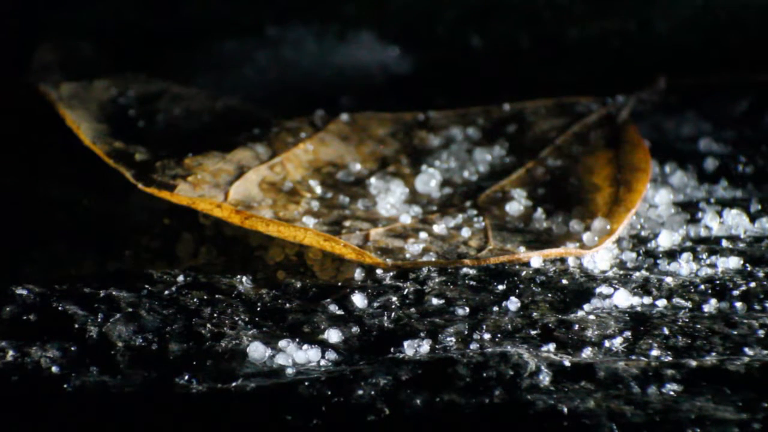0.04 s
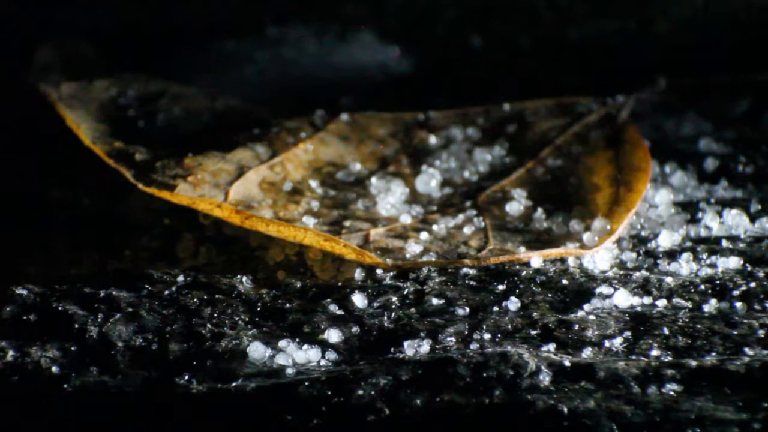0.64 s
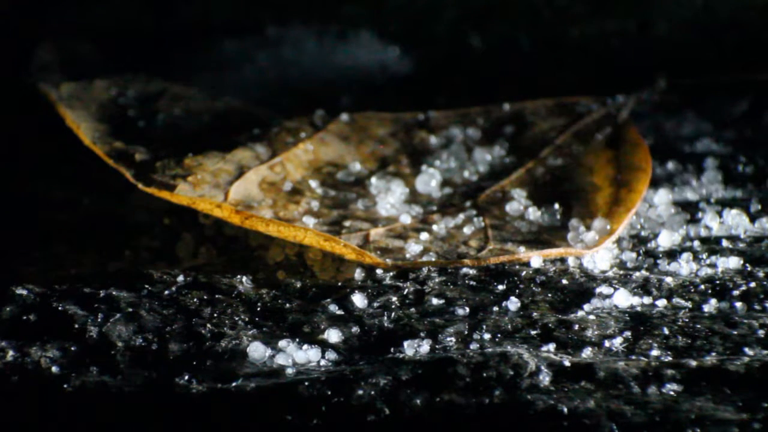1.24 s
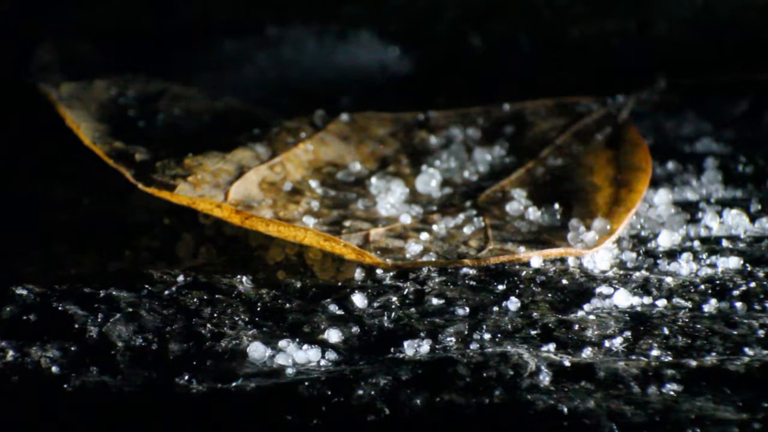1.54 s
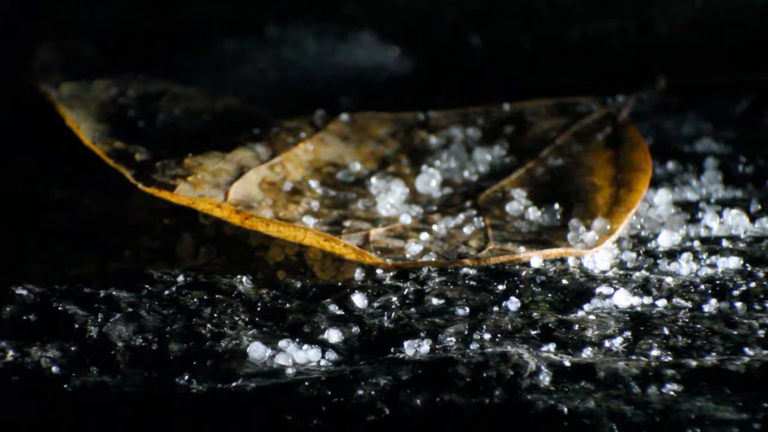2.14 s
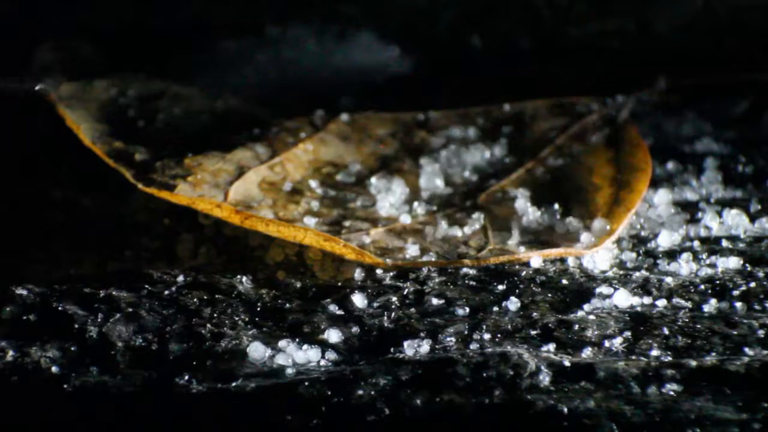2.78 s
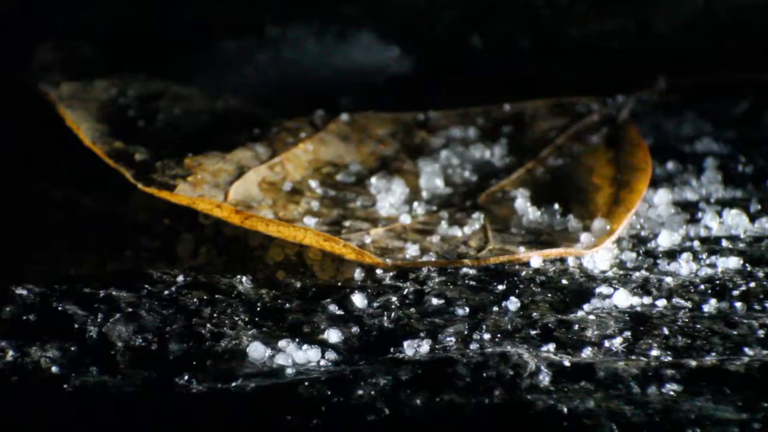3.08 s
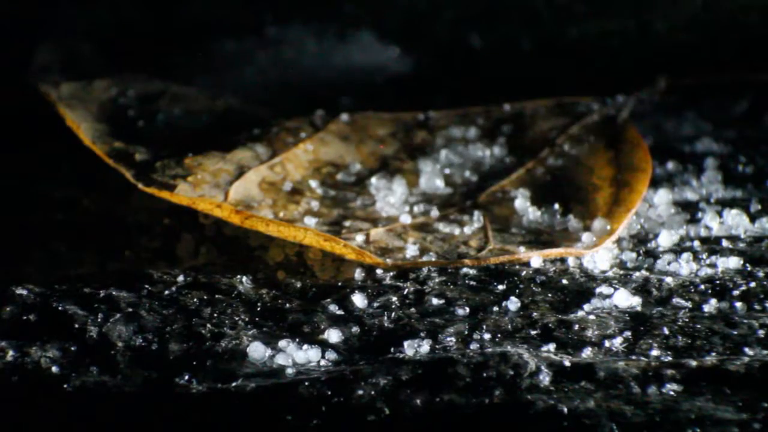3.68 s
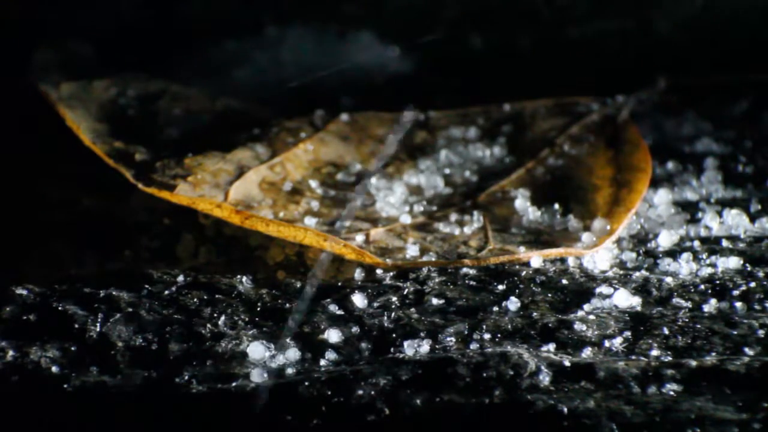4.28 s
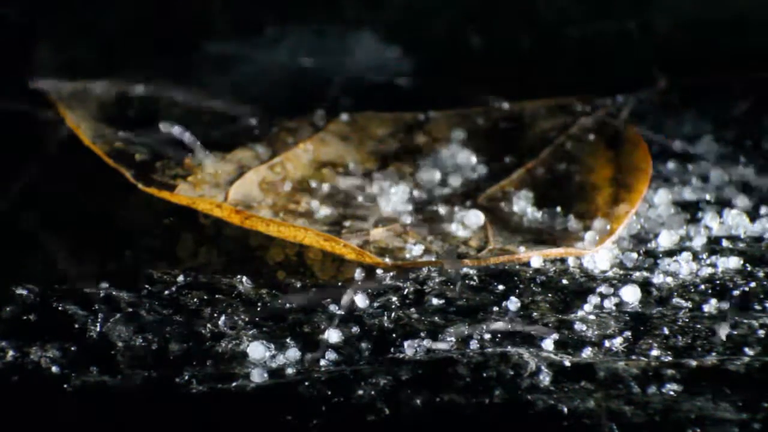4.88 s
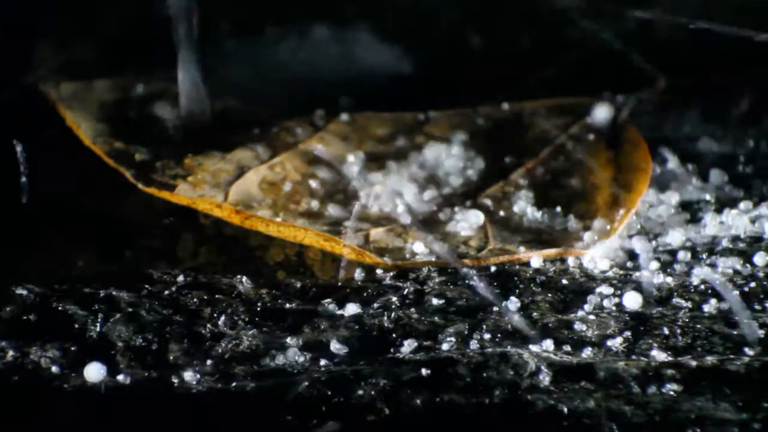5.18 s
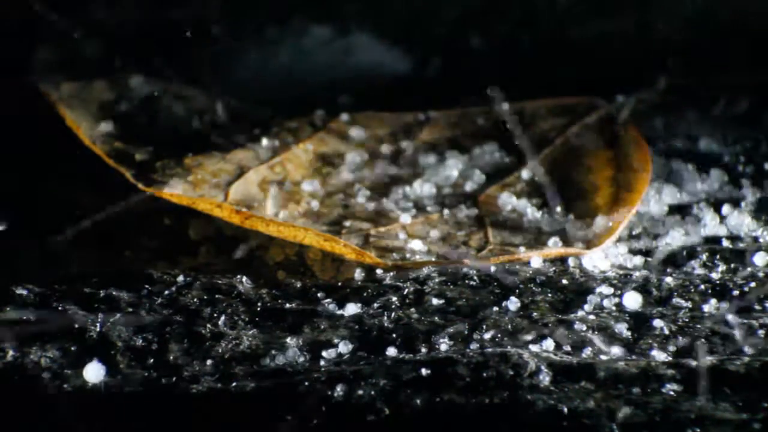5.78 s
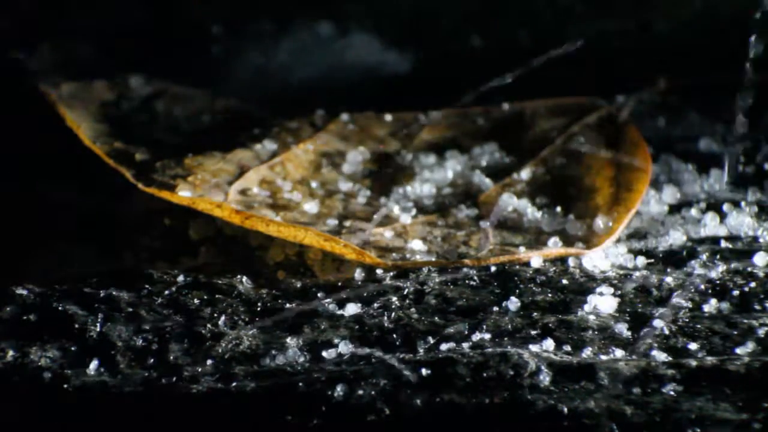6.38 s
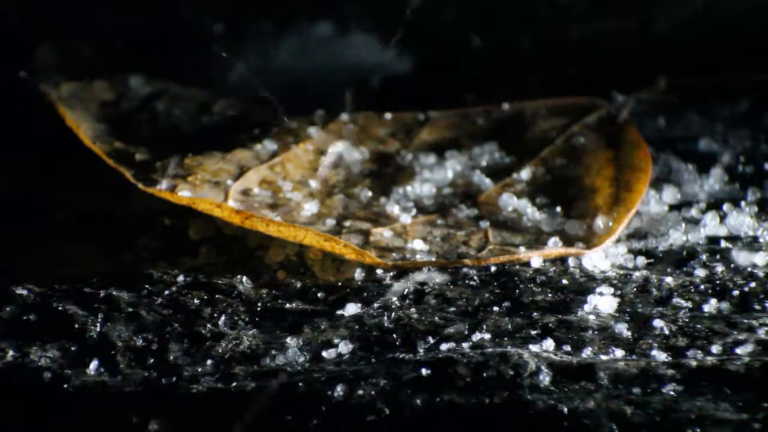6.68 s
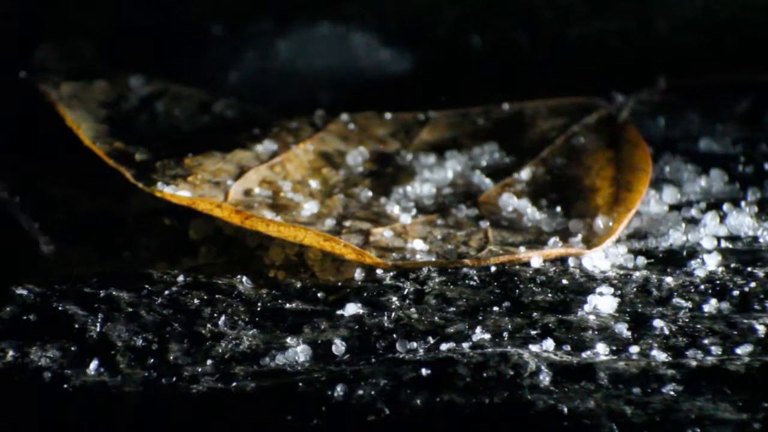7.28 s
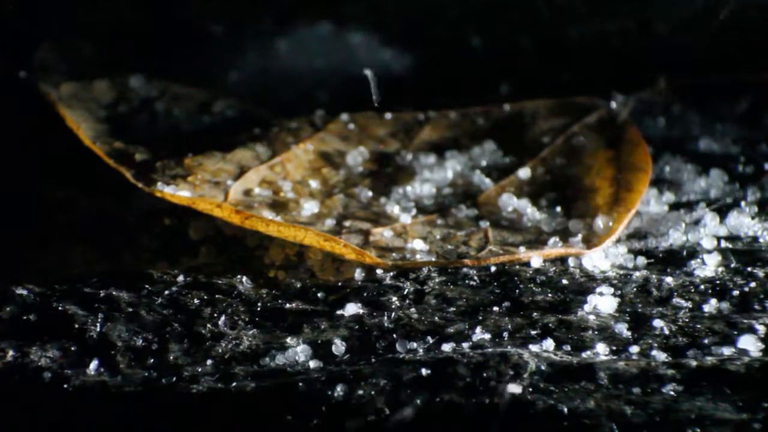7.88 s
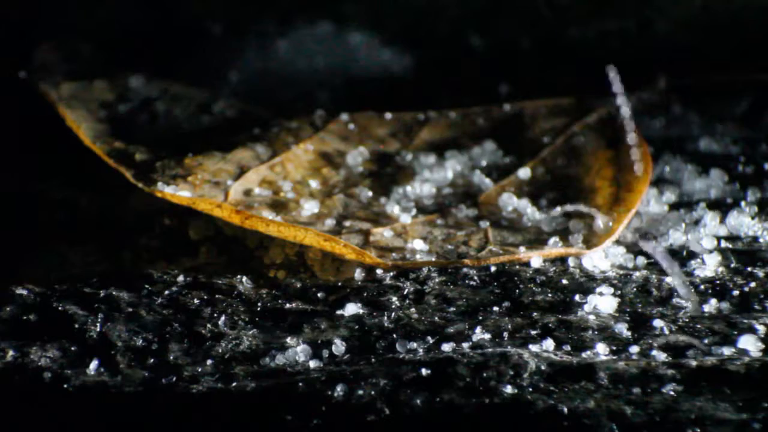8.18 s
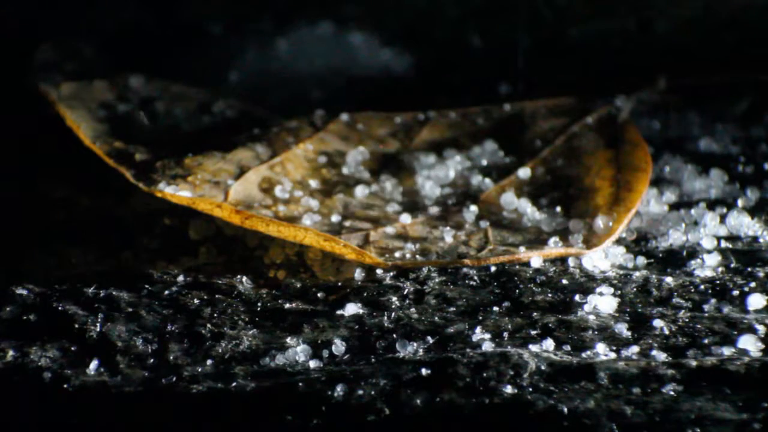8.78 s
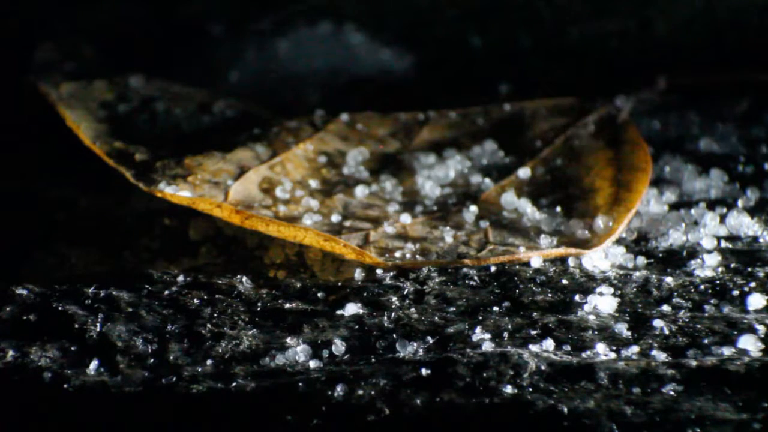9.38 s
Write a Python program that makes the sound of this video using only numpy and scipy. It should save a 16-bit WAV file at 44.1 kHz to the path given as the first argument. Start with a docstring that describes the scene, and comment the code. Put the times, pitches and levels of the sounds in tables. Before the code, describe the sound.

Sleet falls outdoors for about nine and a half seconds without a break. Countless distant pellets make a fine, high patter and fizz, while near ones hit a dry leaf and icy ground close to the microphone as sharp, brittle, irregular ticks, each with a tiny bounce. The shower is lightest for the first two seconds, builds to its fullest between 4 and 5 seconds, then stays fairly dense and eases a little toward the end. Harder ticks stand out near 0.6, 2.7 and 3.2 seconds, in a quick cluster from 4.1 to 4.7, and at 6.6 and 6.9, with the sharpest at 8.4 seconds. Underneath runs a faint low rumble of light wind, weakest around 5 to 6 seconds. It buffets the microphone softly and briefly near 1.6 seconds, around 3 seconds, and again near 4.4, 5.6 and 8.7 seconds.

```python
"""Sleet pellets fall on a dry leaf and icy ground at night.
Near ones tick, ring the struck spot and bounce once; countless far ones patter and fizz.
A light wind rumbles, and its eddies now and then buffet the microphone.
The hardest ticks push the recorder's limiter, so the patter ducks briefly after them."""
import sys
import numpy as np
from scipy import signal
from scipy.fft import rfft, irfft, next_fast_len
from scipy.io import wavfile
from scipy.ndimage import uniform_filter1d, map_coordinates

SR = 44100
rng = np.random.default_rng(int(sys.argv[2]) if len(sys.argv) > 2 else 0)


def store_wav(level_fs):
    """Save 16-bit WAV to argv[1]."""
    pcm = np.round(np.clip(np.atleast_2d(level_fs), -1, 1) * 32767)
    wavfile.write(sys.argv[1], SR, pcm.T.astype(np.int16))


N = 420713

# wind strength: (time [s], relative rumble level [dB], relative air rush level [dB])
WIND_LEVELS = [(0.0, -37, -42), (0.29, -39.5, -40), (0.64, -43, -44), (1.83, -39.5, -41.5),
               (2.63, -37.5, -42), (3.0, -36, -39), (3.4, -41, -44), (4.01, -43.5, -41), (4.38, -44, -45),
               (4.59, -46.5, -49.5), (5.21, -49.5, -58), (5.74, -49.5, -53), (6.3, -43.5, -44.5),
               (6.93, -45, -45), (7.52, -42.5, -44), (8.1, -44, -43.5), (8.26, -43, -44), (9.54, -44, -42)]
# shower strength: (time [s], relative level [dB])
SHOWER_LEVELS = [(0.0, -31), (0.4, -31), (0.64, -33.5), (1.86, -30), (2.55, -28), (3.03, -25.5),
                 (3.43, -27), (3.82, -25), (3.96, -21), (4.97, -22.5), (5.29, -26), (6.35, -23.5),
                 (6.93, -26.5), (7.44, -24.5), (8.13, -25), (8.5, -26), (9.11, -27.5), (9.54, -28)]


def amp(db):
    """Decibels to gain."""
    return 10 ** (np.asarray(db) / 20)


def unit_rms(x):
    """Scale to rms 1."""
    return x / np.sqrt(np.mean(x ** 2) + 1e-20)


def unit_energy(x):
    """Scale to the energy of 1 ms at rms 1."""
    return unit_rms(x) * np.sqrt(SR / 1000 / len(x))


def curves(rows):
    """Per-sample curve for each column after the time."""
    times_s, *columns = np.transpose(rows)
    return [np.interp(np.arange(N) / SR, times_s, column) for column in columns]


def wobble(rate_hz):
    """Smooth random curve with knots at rate_hz."""
    return map_coordinates(rng.standard_normal(1024), [np.arange(N) * rate_hz / SR], mode="wrap")


def filtered(x, response):
    """Apply a complex frequency response."""
    size = next_fast_len(len(x) + min(len(x), 8192))
    return irfft(rfft(x, size) * response(np.fft.rfftfreq(size, 1 / SR)), size)[:len(x)]


def coloured(x, spectrum):
    """Shape by (frequency [Hz], gain [dB]) points; rms 1."""
    points_hz, gain_db = np.transpose(spectrum)
    return unit_rms(filtered(x, lambda hz: amp(np.interp(np.log(hz + 1), np.log(points_hz), gain_db))))


def add(track, time_s, sound):
    """Mix a sound in at time_s."""
    part = track[max(0, round(time_s * SR)):][:len(sound)]
    part += sound[:len(part)]


def arrivals(rate_hz, level_db, scatter_db=4):
    """Random events around a level curve: (time [s], level [dB], draw [0-1], draw [0-1])."""
    when, strength, *spare_draws = rng.random((256, 4))[:int(rate_hz * N / SR)].T
    db = level_db[(when * N).astype(int)] + scatter_db * (2 * strength - 1)
    return np.transpose([when * N / SR, db, *spare_draws])


def wind(rumble_gain_db=2, air_gain_db=2, lumps_db=2, gust_db=1.2):
    """Lumpy rumble under a soft rush of air; both swell in small gusts."""
    # noise spectra: (frequency [Hz], gain [dB])
    rumble_spectrum = [(15, -35), (28, -21), (50, -10.5), (80, -2.5), (115, 0.5), (180, -1), (260, -8.5),
                       (400, -20), (900, -31)]
    air_spectrum = [(80, -11), (200, -11), (330, 0), (600, 0), (850, -4.5), (1400, -5.5), (3000, -14),
                    (8000, -68)]
    rumble_db, air_db = curves(WIND_LEVELS)
    rumble_gain = amp(rumble_db + rumble_gain_db + lumps_db * wobble(rate_hz=25))
    rumble = rumble_gain * coloured(rng.standard_normal(N), rumble_spectrum)
    gusts = amp(gust_db * wobble(rate_hz=7))
    air = amp(air_db + air_gain_db) * coloured(rng.standard_normal(N), air_spectrum)
    return gusts * (rumble + air)


def weak_eddies(centre_hz, rate_hz=4, boost_db=10, span_oct=0.79):
    """Small random eddies riding on the rumble: (time [s], level [dB], pitch [Hz])."""
    rumble_db, _ = curves(WIND_LEVELS)
    return [(time_s, db, centre_hz * 2 ** (span_oct * (smallness - 0.5)))
            for time_s, db, smallness, _ in arrivals(rate_hz, rumble_db + boost_db)]


def swirls(eddies, centre_hz, count=2, gain_db=-12, scatter_s=0.045, scatter_db=3.5, scatter_oct=0.46):
    """Smaller eddies around each strong one: (time [s], level [dB], pitch [Hz])."""
    draws = rng.standard_normal((len(eddies), count, 3))
    return [(time_s + scatter_s * lag,
             db + gain_db + scatter_db * strength,
             centre_hz * 2 ** (scatter_oct * smallness))
            for (time_s, db, _), group in zip(eddies, draws) for lag, strength, smallness in group]


def buffets(gain_db=3, eddy_hz=168, bluntness=3.36, leak_hz=85, size=2048):
    """Each eddy pushes and pulls the diaphragm once; a sharper crest reaches higher frequencies."""
    # strongest eddies at the microphone: (time [s], relative peak [dB], pitch [Hz])
    strong_eddies = [(1.416, -26, 129), (1.629, -15, 153), (1.725, -19, 172), (2.075, -25, 189),
                     (2.155, -19, 100), (2.179, -17.5, 146), (2.812, -15, 128), (2.837, -11.5, 185),
                     (2.851, -13, 120), (2.871, -12.5, 146), (2.978, -19, 134), (3.085, -11, 204),
                     (3.103, -17, 180), (3.595, -17, 115), (4.359, -16.5, 190), (4.463, -25.5, 170),
                     (4.963, -26.5, 196), (5.039, -30, 158), (5.37, -28, 93), (5.474, -31, 109),
                     (5.611, -23, 137), (5.642, -18, 145), (5.658, -26, 160), (8.664, -12.5, 121)]
    out = np.zeros(N)
    t = (np.arange(size) - size / 2) / SR
    for time_s, db, hz in list(strong_eddies) + swirls(strong_eddies, eddy_hz) + weak_eddies(eddy_hz):
        phasor = np.exp(2j * np.pi * rng.random())
        push = phasor / (1 - 2j * np.pi * hz * t / bluntness) ** bluntness
        add(out, time_s + t[0], amp(db + gain_db) * push.real * np.hanning(size))
    # slow pressure leaks past the diaphragm
    return filtered(out, lambda hz: 1j * hz / (leak_hz + 1j * hz))


def ring(spot_hz, t60_cycles=45, max_t60_s=0.022, size=1536):
    """The struck spot swings on briefly, with two weaker modes close by."""
    t = np.arange(size) / SR
    modes_hz = spot_hz * np.array([1, rng.uniform(0.82, 0.92), rng.uniform(1.1, 1.3)])[:, None]
    modes_db = np.array([0, -10, -8])[:, None]
    t60_s = np.minimum(t60_cycles / modes_hz, max_t60_s)
    modes = amp(modes_db - 60 * t / t60_s) * np.sin(2 * np.pi * modes_hz * t)
    return unit_energy(modes.sum(0))


def impact(edge_hz, slope_db_oct, crack_t60_s=0.003, rattle_t60_s=0.026, rattle_db=-20,
           attack_s=0.00016, edge_q=1.54, leaf_hz=1250, top_hz=15000, size=768):
    """One pellet: brittle crunch and faint rattle, coloured by the struck spot."""
    t = np.arange(size) / SR
    decay = amp(-60 * t / crack_t60_s) + amp(rattle_db - 60 * t / rattle_t60_s)
    crunch = rng.standard_normal(size) * decay * (1 - np.exp(-t / attack_s))
    # cut below the leaf's lowest mode
    crunch = signal.sosfilt(signal.butter(4, leaf_hz, "high", fs=SR, output="sos"), crunch)

    def spot_response(hz):
        s = 1j * (hz + 1) / edge_hz
        radiation = s * s / (s * s + s / edge_q + 1)  # a small surface radiates little below edge_hz
        tilt = s ** (slope_db_oct / (20 * np.log10(2)))
        return radiation * tilt / np.sqrt(1 + (hz / top_hz) ** 24)
    return unit_energy(filtered(crunch, spot_response))


def patter(rate_hz, low_hz, high_hz, spread_db, ring_db, spots=24):
    """Pellets land at random on spots of many pitches; most are far and faint."""
    out = np.zeros(N)
    for spot_hz in np.geomspace(low_hz, high_hz, spots):
        when, distance, polarity = rng.random((4000, 3))[:int(rate_hz * N / SR / spots)].T
        nearness = -np.log(0.02 + 0.98 * distance)
        blows = np.bincount((when * N).astype(int), amp(spread_db * nearness) * np.sign(polarity - 0.5), N)
        tick = amp(ring_db) * ring(spot_hz)
        add(tick, 0, impact(spot_hz, slope_db_oct=-1.1))
        out += signal.oaconvolve(blows, tick)[:N]
    # flatten the summed spectrum
    spectrum = rfft(out)
    smooth_power = np.abs(uniform_filter1d(np.abs(spectrum) ** 2, 1501))
    return unit_rms(irfft(spectrum / np.sqrt(smooth_power + 1e-9), N))


def shower(coarse_gain_db=-7, fine_gain_db=1, hiss_db=-3, flurry_db=0.9, coarse_swell=0.88):
    """Coarse pellets patter, fine ones fizz, the farthest merge into hiss; all in small flurries."""
    # pellet spectra: (frequency [Hz], gain [dB])
    coarse_spectrum = [(300, -20), (800, -12.5), (1200, -4.5), (1900, -0.5), (3500, 1), (5500, -1),
                       (9000, 0.5), (16000, -6.5)]
    fine_spectrum = [(800, -23.5), (2500, -12), (5000, -6.5), (8000, -4), (10500, -1.3), (13000, 0),
                     (15000, -3.5), (16000, -3)]
    fine_db, = curves(SHOWER_LEVELS)
    coarse_db = fine_db.mean() + coarse_swell * (fine_db - fine_db.mean())
    coarse = patter(rate_hz=900, low_hz=1405, high_hz=6910, spread_db=3.5, ring_db=-5)
    coarse += amp(hiss_db) * rng.standard_normal(N)
    fine = patter(rate_hz=1800, low_hz=3070, high_hz=12600, spread_db=4.5, ring_db=-6.5)
    fine += amp(hiss_db) * rng.standard_normal(N)
    coarse = amp(coarse_db + coarse_gain_db) * coloured(coarse, coarse_spectrum)
    fine = amp(fine_db + fine_gain_db) * coloured(fine, fine_spectrum)
    return amp(flurry_db * wobble(rate_hz=32)) * (coarse + fine)


def soft_hits(rate_hz=10, boost_db=6.5, swell=0.74, low_hz=2400, high_hz=9000,
              dull_db_oct=-2, bright_db_oct=7):
    """Random near pellets, harder as the shower grows; columns as in hard_hits."""
    shower_db, = curves(SHOWER_LEVELS)
    level_db = shower_db.mean() + swell * (shower_db - shower_db.mean()) + boost_db
    return [(time_s, db,
             low_hz * (high_hz / low_hz) ** spot,
             dull_db_oct + (bright_db_oct - dull_db_oct) * hardness)
            for time_s, db, spot, hardness in arrivals(rate_hz, level_db)]


def near_pellets(gain_db=1, edge_ratio=1.11, ring_db=-8.5, ring_loss_oct=1.24,
                 bounce_db=-19, bounce_s=0.013):
    """Single ticks on and beside the leaf; each crunches, rings and hops once. Dull hits ring most."""
    # hardest near pellets: (time [s], relative level [dB], spot pitch [Hz], brightness [dB/octave])
    hard_hits = [(0.1298, -16, 2570, 5.5), (0.14, -16, 2260, 6), (0.311, -20, 4780, 7),
                 (0.4138, -15, 7540, 13), (0.4505, -17, 4370, 13), (0.4863, -22.5, 2560, -6),
                 (0.4973, -11.5, 3070, 7), (0.55, -9.5, 5250, 12), (0.578, -4.5, 6040, 6),
                 (0.6156, -13, 4850, 15), (0.9278, -12, 1920, 9), (0.9364, -10, 4600, 5.5),
                 (0.9675, -15.5, 2900, 3.5), (1.2266, -12, 6400, -1), (1.2312, -11.5, 4360, 0.5),
                 (1.403, -18.5, 5900, -8), (1.4626, -13.5, 6060, -3), (1.639, -17.5, 2210, 8),
                 (1.6613, -12, 6560, 5), (1.992, -8.5, 3170, 9.5), (2.0098, -13, 9530, 6),
                 (2.3233, -7, 4700, 8), (2.36, -18, 6250, -4), (2.7197, -2.5, 4100, 7.5),
                 (2.7312, -6.5, 5400, 4), (2.8478, -15.5, 1990, -0.5), (3.154, -10, 6000, 5),
                 (3.2415, -5, 3840, 6.5), (3.3388, -25, 3520, -5), (3.4653, -8.5, 2900, 6),
                 (3.5421, -14, 2850, 7), (3.6176, -12, 5670, 1), (3.9015, -10, 6900, 4),
                 (4.1293, -21, 4030, 0), (4.1308, -6.5, 4030, -4), (4.135, -16, 4000, -5),
                 (4.232, -6.5, 2640, 1.5), (4.2602, -14, 3070, 4), (4.299, -7, 5840, -2),
                 (4.3098, -8, 8800, 1), (4.3142, -12, 3200, 2), (4.477, -7, 4760, -0.5),
                 (4.5287, -11, 2620, -0.5), (4.5502, -19, 4300, 13), (4.5606, -6, 1410, 3.5),
                 (4.6222, -13, 6700, -1), (4.669, -10.5, 3900, 2), (4.765, -12.5, 6650, -1.5),
                 (5.0878, -13, 3570, 2), (5.1949, -9, 1900, 3), (5.9086, -9.5, 8000, 0),
                 (6.0008, -18, 4160, 3), (6.2167, -12, 8500, -0.5), (6.4139, -16, 2050, 4),
                 (6.559, -4.5, 5800, 7), (6.6447, -9, 3400, 3), (6.6177, -12.5, 1870, 5),
                 (6.8645, -4, 1690, 7.5), (6.9516, -10.5, 2600, 2), (7.0786, -27, 2200, -5),
                 (7.5958, -20, 3510, -2), (8.1826, -13.5, 6900, -3), (8.311, -20, 1820, 2),
                 (8.34, -7, 2800, 3.5), (8.4171, 0, 4500, 7), (8.4953, -13, 3420, 3), (8.6385, -5, 5900, 4),
                 (8.707, -14.5, 3940, 3), (9.0321, -13, 4200, 0.5), (9.0634, -14, 3040, 1.5),
                 (9.3459, -6.5, 2000, 9), (9.4964, -31, 1760, -12)]
    out = np.zeros(N)
    for time_s, db, spot_hz, slope_db_oct in list(hard_hits) + soft_hits():
        edge_hz = edge_ratio * spot_hz
        add(out, time_s, amp(db) * impact(edge_hz, slope_db_oct, crack_t60_s=0.0034))
        add(out, time_s, amp(db + ring_db - ring_loss_oct * slope_db_oct) * ring(spot_hz))
        hop_s = bounce_s * np.exp(0.5 * rng.standard_normal())
        add(out, time_s + hop_s, amp(db + bounce_db) * impact(edge_hz, slope_db_oct))
    return amp(gain_db) * out


def scene():
    """Sleet and wind at one microphone."""
    return (near_pellets() + shower() + wind() + buffets())[None]


def limiter(x, ceiling_db=-8.5, release_s=0.092, window=44):
    """Gain drops at once when the 1 ms level passes the ceiling, then recovers."""
    level_db = 10 * np.log10(np.abs(uniform_filter1d(x * x, window)) + 1e-12)
    excess_db = np.maximum(level_db - ceiling_db, 1e-9)
    age = np.arange(N) / SR / release_s
    cut_db = np.exp(np.maximum.accumulate(np.log(excess_db) + age) - age)  # decaying peak hold
    return x * amp(-uniform_filter1d(cut_db, window))


def record(dry, top_hz=15900):
    """Limiter, soft clip at full scale, band limit."""
    x = limiter(dry[0])
    rounded = x / (1 + np.abs(x) ** 6) ** (1 / 6)
    return filtered(rounded, lambda hz: hz < top_hz)[None]


dry = scene()
out = record(dry)
store_wav(out)
```